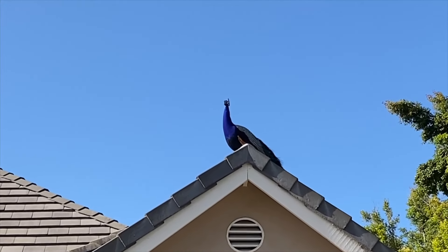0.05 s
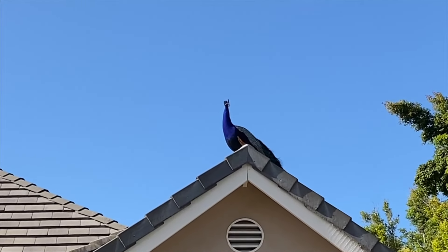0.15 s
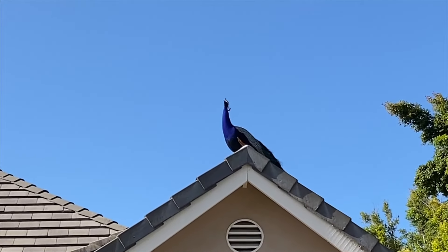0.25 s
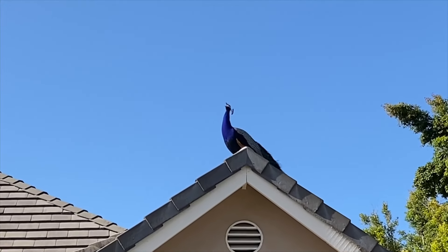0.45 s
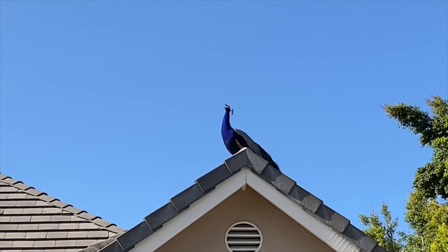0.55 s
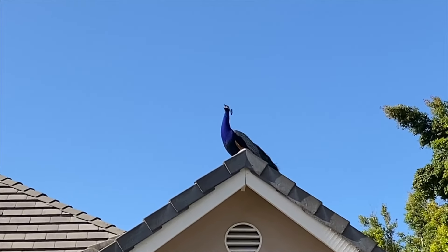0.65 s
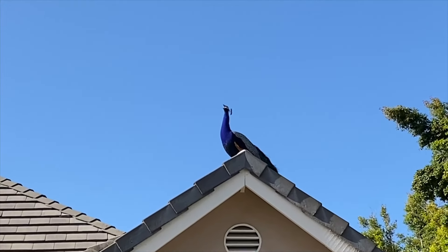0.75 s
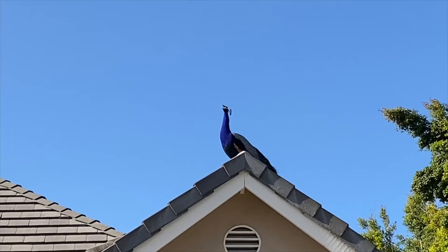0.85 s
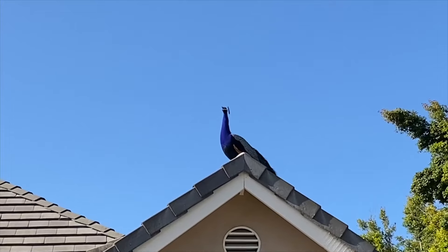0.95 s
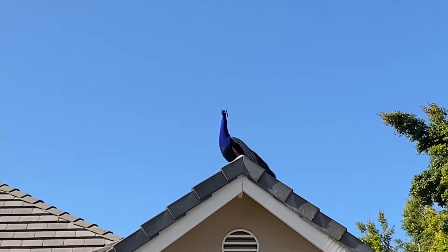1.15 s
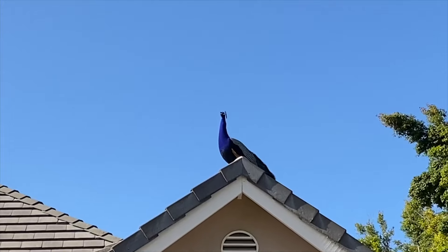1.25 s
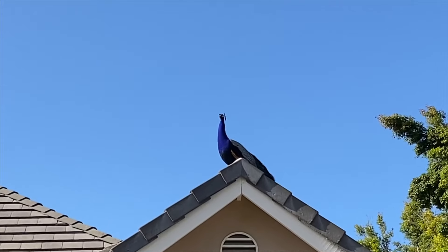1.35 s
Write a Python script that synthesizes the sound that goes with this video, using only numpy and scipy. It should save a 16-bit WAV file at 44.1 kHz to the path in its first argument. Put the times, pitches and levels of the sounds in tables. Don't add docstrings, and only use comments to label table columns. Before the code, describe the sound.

A peacock gives one loud wailing call from a rooftop, echoing briefly over faint outdoor hush.

```python
import sys
import numpy as np
from scipy import signal
from scipy.fft import rfft, irfft
from scipy.io import wavfile
from scipy.ndimage import uniform_filter1d

SR = 44100
rng = np.random.default_rng(int(sys.argv[2]) if len(sys.argv) > 2 else 0)


def natural_amplitude(level_db):
    exponent = np.asarray(level_db, float) / 20
    return 10 ** exponent


def transcribe(u):
    v = np.clip(np.atleast_2d(u).T, -1, 1)
    q = np.round(v * 32767).astype(np.int16)
    wavfile.write(sys.argv[1], SR, q)


N = 61739
T = np.arange(N) / SR


def evened(x):
    return x / np.sqrt(np.mean(x ** 2) + 1e-20)


def drift(size):
    return evened(uniform_filter1d(rng.standard_normal(N), size))


def read(points, hz):
    f, value = np.transpose(points)
    return np.interp(np.log(hz + 1), np.log(f + 1), value)


def curve(table, column, size=441):
    rows = np.array(table)
    return uniform_filter1d(np.interp(T, rows[:, 0], rows[:, column]), size)


def peak(hz, centre, width):
    return 1 / (1 + ((hz ** 2 - centre ** 2) / (hz * width)) ** 2)


def peacock():
    # time_s, pitch_hz
    pitch_track = [(.182, 582), (.274, 652.5), (.36, 685.3), (.448, 725.4), (.51, 729.1), (.662, 688.3),
                   (.824, 617), (.874, 593), (.925, 530)]
    # time_s, effort_db, throat_hz, upper_partials_db
    effort_track = [(.183, -42, 2300, -10), (.212, -29.5, 2240, -9.5), (.28, -20.5, 2587, -15),
                    (.325, -19, 2080, -17), (.40, -18.5, 1800, -12.5), (.51, -14.5, 1502, -25),
                    (.64, -13.5, 1365, -28), (.8, -20.5, 1215, -21.5), (.905, -37.5, 1100, -9)]
    # time_s, low_dip_hz, low_depth_db, high_dip_hz, high_depth_db
    dips = [(.2, 3050, -6.5, 8500, 7.5), (.27, 3030, 4.5, 8500, -11), (.33, 3520, -20, 7500, -2.5),
            (.45, 3700, -15.5, 7800, -12), (.5, 3760, -24, 7700, 0), (.54, 2150, -29, 6700, -11.5),
            (.63, 2130, -18, 6900, -16.5), (.78, 2420, -19, 6650, 0), (.9, 2200, -11.5, 6400, -5)]
    # time_s, second_hz, second_db, third_hz, third_db
    upper_modes = [(.2, 3900, -3.5, 6700, 6), (.27, 3210, 0, 6700, 7), (.33, 4050, 7, 5900, 6.5),
                   (.43, 4160, 7.5, 5580, 2.5), (.52, 2730, 6, 5200, -1), (.6, 2640, 7.5, 8100, 20.5),
                   (.73, 3390, 5.5, 8050, 5.5), (.9, 3670, 1, 7200, 2.5)]
    # frequency_hz, level_db
    sheen = [(500, -2), (2000, 8.5), (4000, 1), (7000, -8.5), (9000, -13), (12000, -24.5), (16000, -23.5)]
    throat_width_hz, upper_width_hz, dip_width_hz = 620, 510, 354
    start_s, stop_s, voice_end_s = effort_track[0][0], effort_track[-1][0], pitch_track[-1][0]

    hz = curve(pitch_track, column=1, size=1500) * (1 + 0.0014 * drift(600))
    effort = curve(effort_track, column=1)
    throat = curve(effort_track, column=2, size=1200)
    bright = natural_amplitude(curve(effort_track, column=3))
    low, low_db, high, high_db = (curve(dips, column=k) for k in range(1, 5))
    second, second_db, third, third_db = (curve(upper_modes, column=k) for k in range(1, 5))

    shake = 0.014 * np.exp(-abs(T - start_s) / 0.053) * drift(70)
    turns = np.cumsum(hz * (1 + shake)) / SR

    leak_db = -34.5 + 0.69 * (effort + 17.5)
    out = natural_amplitude(leak_db - effort) * np.cos(2 * np.pi * turns)
    for k in range(2, 28):
        f = k * hz
        upper_db = read(sheen, f)
        upper_db += low_db * peak(f, low, dip_width_hz) + high_db * peak(f, high, 2 * dip_width_hz)
        upper_db += second_db * peak(f, second, upper_width_hz)
        upper_db += third_db * peak(f, third, 2 * upper_width_hz)
        opening = np.clip((T - start_s - k * 0.00037) / 0.0027, 0, 1)
        closing = np.clip((voice_end_s - k * 0.0016 - T) / 0.03, 0, 1)
        upper = natural_amplitude(upper_db) * opening * closing
        lag = 2 * np.arctan2(f * throat_width_hz, throat ** 2 - f ** 2) + 0.038 * min(k, 9) ** 2
        level = peak(f, throat, throat_width_hz) ** 2.02 + bright * upper
        out += level * np.cos(2 * np.pi * k * turns - lag)

    breath = natural_amplitude(-40.5) * 3 * uniform_filter1d(rng.standard_normal(N), 9)
    attack = np.clip((T - start_s) / 0.0011, 0, 1)
    release = np.clip(1 + (stop_s - T) / 0.041, 0, 1) ** 2
    return np.sqrt(2) * natural_amplitude(effort) * attack * release * out * (1 + breath)


def yard_tail():
    # frequency_hz, t60_s
    decay = [(500, 1), (1300, 0.98), (2500, 0.83), (5000, 0.69), (10000, 0.21)]
    taps = np.zeros((2, SR))
    at = np.arange(0, SR - 20, 20) + rng.integers(0, 20, (2, (SR - 1) // 20))
    np.put_along_axis(taps, at, rng.choice([-1., 1.], at.shape), 1)
    f, t, z = signal.stft(taps, SR, nperseg=256)
    z = z * natural_amplitude(-60 * t / read(decay, f)[:, None])
    wide = np.clip(1.3 - f / 2500, .1, 1)[:, None]
    z = np.array([z[0] + wide * z[1], z[0] - wide * z[1]])
    tail = signal.istft(z, SR, nperseg=256)[1]
    return tail / np.linalg.norm(tail[0])


def outdoors(x):
    # left_ms, right_ms, level_db
    bounces = [
        (4.904, 4.93, -3),
        (2.19, 2.3, -29.5),
        (30.04, 34.2, -28.5),
    ]
    # delay_s, level_db, left_minus_right_db
    walls = [
        (.1886, -16.5, 2),
        (.1637, -29, -6),
        (.136, -26, 0),
    ]
    # frequency_hz, level_db
    wall_colour = [(600, -30.5), (1270, -1.5), (2200, -6.5), (3200, -0.5), (4500, -5), (6000, -16),
                   (9000, -25)]
    # frequency_hz, lead_rad
    left_lead = [(430, .9), (700, .3), (1460, .1), (3000, .2), (3600, 0), (7450, 0), (7700, -1.24),
                 (16000, -13.37)]
    # frequency_hz, share
    width_kept = [(3000, 1), (3700, .1), (7300, .1), (7800, 1)]
    # frequency_hz, level_db
    tail_colour = [(600, -3.5), (1000, 1.5), (1300, -2), (1700, -3), (3000, -1), (8000, 3.5)]

    size = 1 << 17
    hz = np.fft.rfftfreq(size, 1 / SR)
    side = np.array([[1], [-1]])
    path = np.ones((2, len(hz)), complex)
    dull = np.exp(1j * 0.52 / (1 + (hz / 1000) ** 6)) / (1 + (hz / 9500) ** 4)
    for left, right, db in bounces:
        delay_s = np.array([[left], [right]]) / 1000
        path += natural_amplitude(db) * dull * np.exp(-2j * np.pi * hz * delay_s)
    for s, db, pan_db in walls:
        path += natural_amplitude(db + side * pan_db / 2 + read(wall_colour, hz)) * np.exp(-2j * np.pi * hz * s)

    path = path.mean(0) + side * read(width_kept, hz) * (path[0] - path[1]) / 2
    lead = np.interp(hz, *np.transpose(left_lead))
    path *= np.exp(.5j * side * (lead + 0.5 * np.sin(lead) * (hz > 7000)))

    tail_gap = np.exp(-2j * np.pi * hz * .012)
    path += natural_amplitude(-16 + read(tail_colour, hz)) * rfft(yard_tail(), size) * tail_gap
    return irfft(rfft(x, size) * path * (hz < 15900), size)[:, :N]


def songbird():
    u = np.clip((T - .112) / 0.041, 0, 1)
    hz = 3780 + 215 * np.sin(np.pi * u ** .6)
    return natural_amplitude(-61) * np.sin(np.pi * u ** 0.55) * np.sin(2 * np.pi * np.cumsum(hz) / SR)


def hum():
    # order, level_db
    orders = [(1, -48), (3, -57.5), (4, -55), (5, -57.5), (6, -68), (7.3, -68), (8.3, -68.5)]
    # time_s, level_db
    throb = [(0, -8.5), (.3, -6), (.55, -6.5), (.8, 3.5), (1.0, 0), (1.1, 6), (1.2, -4), (1.3, 2),
             (1.38, 10)]
    out = np.zeros((2, N))
    turns = np.cumsum(49.03 + 0.52 * drift(8000)) / SR
    for order, db in orders:
        slow = uniform_filter1d(uniform_filter1d(rng.standard_normal(N), 2500), 2500)
        waver_db = 4 * evened(slow)
        pan_db = np.array([[-1], [1]])
        if order <= 1.5:
            waver_db, pan_db = curve(throb, column=1, size=1500), 0
        phase = 2 * np.pi * (order * turns + rng.random()) + np.array([[0], [order * 0.16]])
        out += np.sqrt(2) * natural_amplitude(db + waver_db + pan_db) * np.cos(phase)
    return out


def noise(spectrum, patchy_db, size):
    # frequency_hz, likeness
    likeness = [(60, 0.9), (180, 0.93), (550, -0.11), (1650, 0.41), (4970, 0.93), (15000, -0.27)]
    frames, hz = N * 4 // size + 5, np.fft.rfftfreq(size, 1 / SR)
    a, b, c, d, patches = rng.standard_normal((frames, len(hz), 5)).T
    patches = evened(uniform_filter1d(uniform_filter1d(patches, 10, 0), 12, 1))
    same = np.clip(read(likeness, hz), -1, 1)[:, None]
    left, other = a + 1j * b, c + 1j * d
    right = same * left + np.sqrt(1 - same ** 2) * other
    z = np.array([left * natural_amplitude(-2 * (hz[:, None] > 110)), right])
    z *= natural_amplitude(read(spectrum, hz)[:, None] + patchy_db * patches)
    return evened(signal.istft(z, nperseg=size, noverlap=size * 3 // 4)[1][:, :N])


def wind():
    # frequency_hz, level_db per Hz
    rumble = [(25, -47.5), (35, -23), (46, -14), (75, 5), (100, -3), (200, -7), (300, -10), (500, -47.5)]
    # time_s, level_db
    gusts = [(0, -56.5), (.27, -47.5), (.4, -50.5), (.62, -48.5), (.9, -48), (1.06, -45.5), (1.2, -50.5),
             (1.4, -50)]
    return natural_amplitude(curve(gusts, column=1)) * noise(rumble, patchy_db=2.5, size=4096)


def air():
    # frequency_hz, level_db per Hz
    hiss = [(200, -25), (300, -7.5), (1000, -14.5), (1400, -9.5), (3100, -21.5), (5000, -32), (9000, -41.5),
            (12500, -85)]
    return natural_amplitude(-54) * noise(hiss, patchy_db=2.5, size=1024)


def scene():
    return outdoors(peacock()) + songbird() + hum() + wind() + air()


def top_cut(x):
    return signal.sosfilt(signal.butter(12, 16790, fs=SR, output="sos"), x)


def record(dry):
    # time_s, gain_db
    gain_track = [(.2, 3.5), (.35, -2.5), (.518, -2.5), (.5195, -5.5), (.7, -8.5), (1.0, -1.5), (1.4, -2)]
    mix = dry * natural_amplitude(curve(gain_track, column=1, size=9))
    return top_cut(mix)


dry = scene()
out = record(dry)
transcribe(out)
```